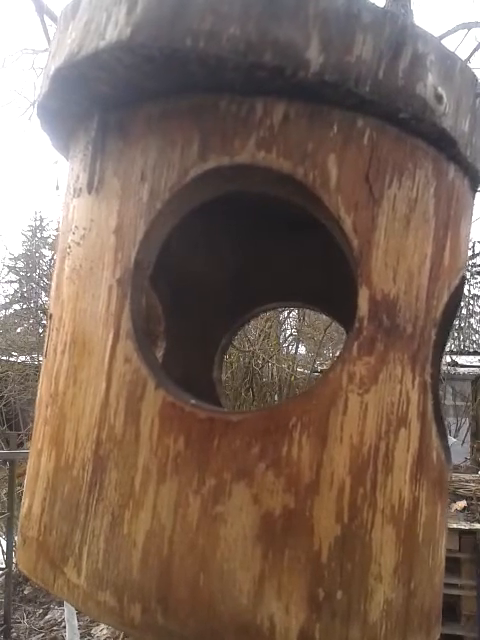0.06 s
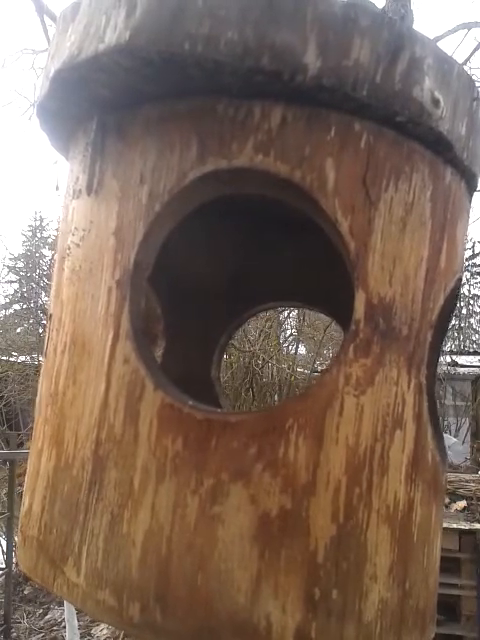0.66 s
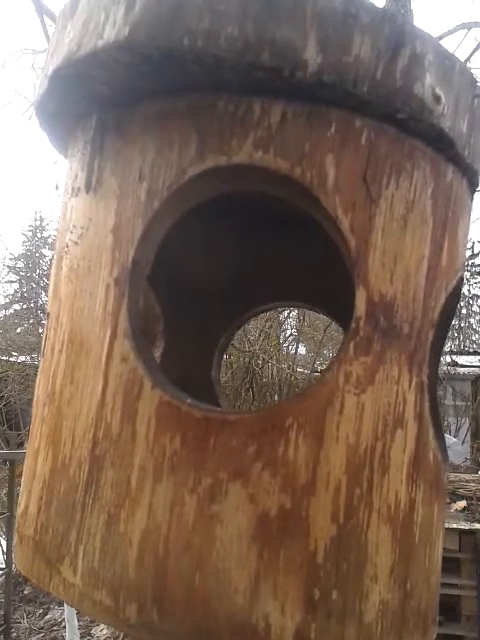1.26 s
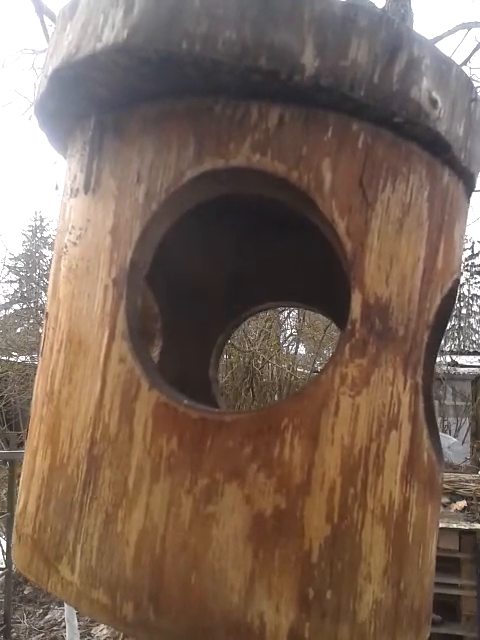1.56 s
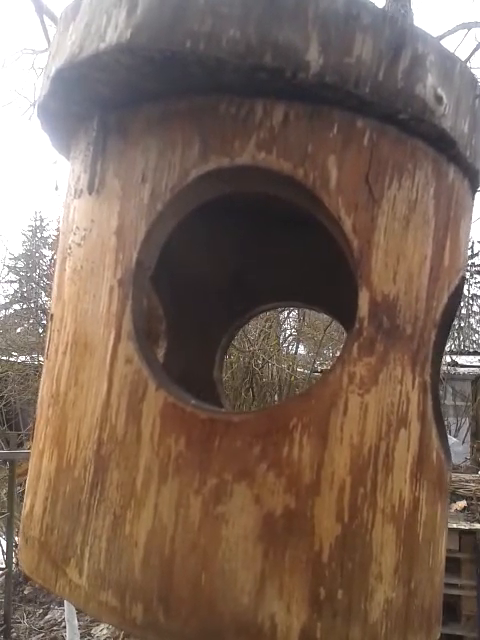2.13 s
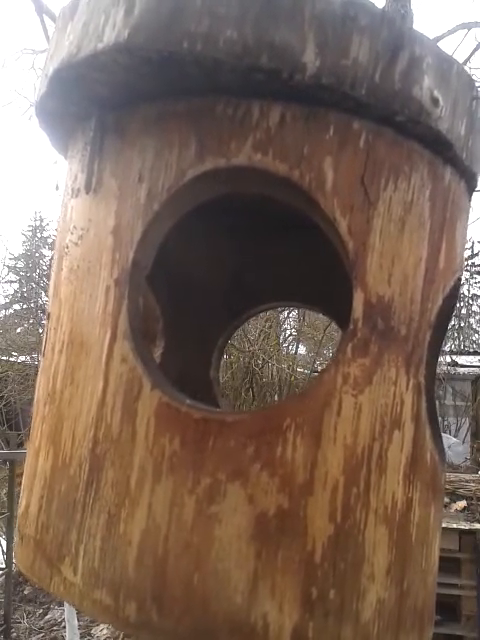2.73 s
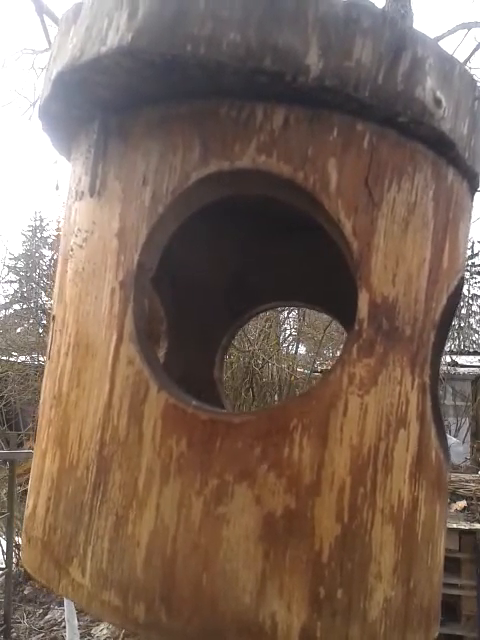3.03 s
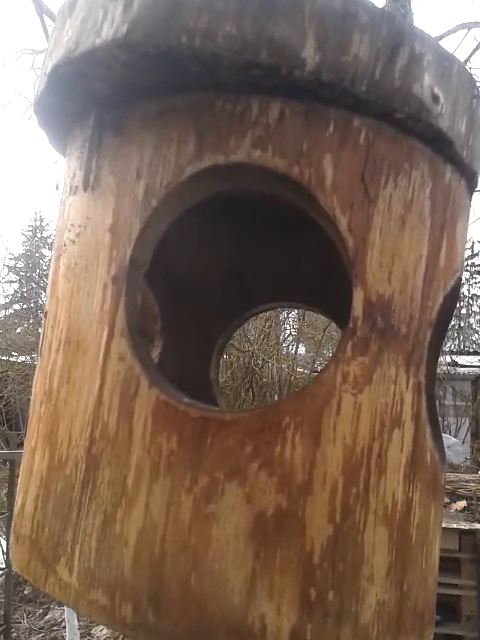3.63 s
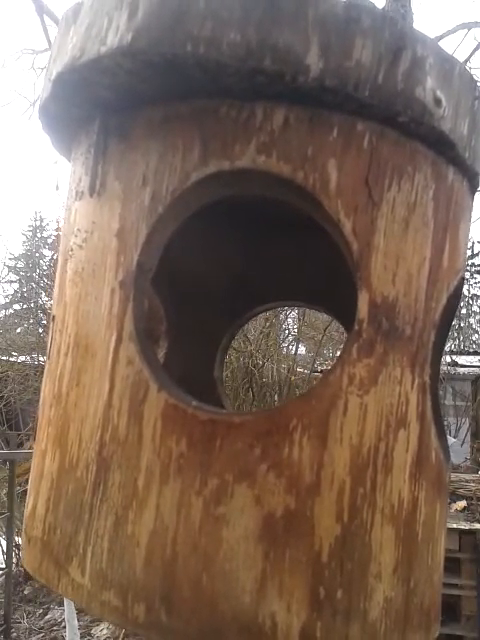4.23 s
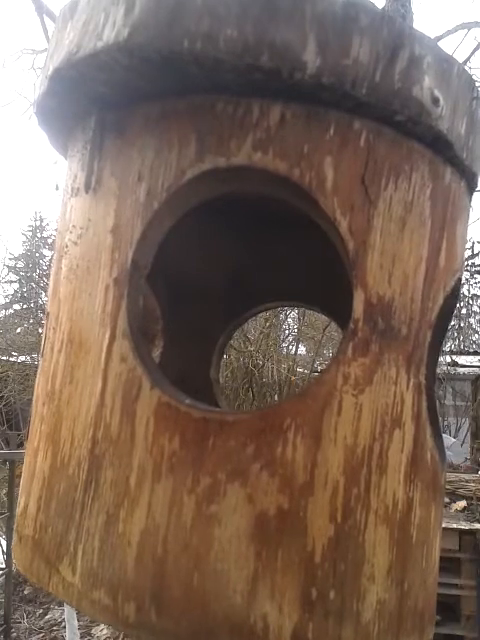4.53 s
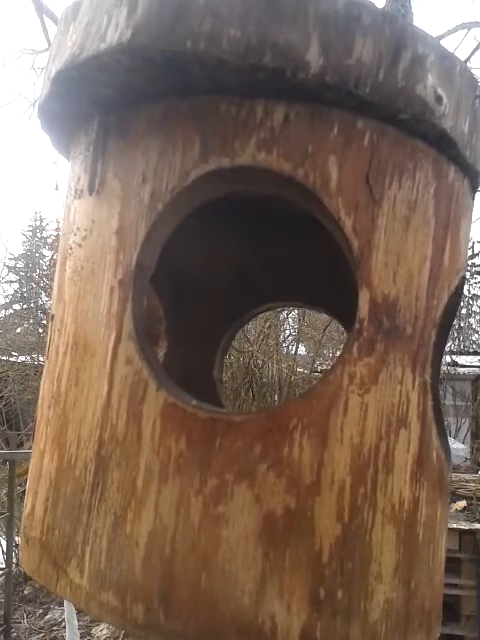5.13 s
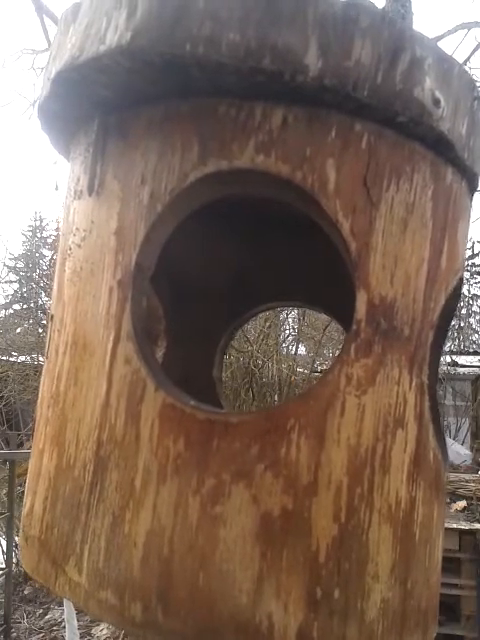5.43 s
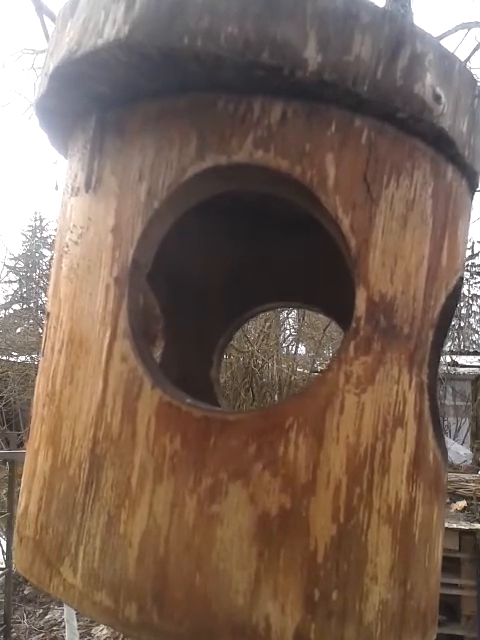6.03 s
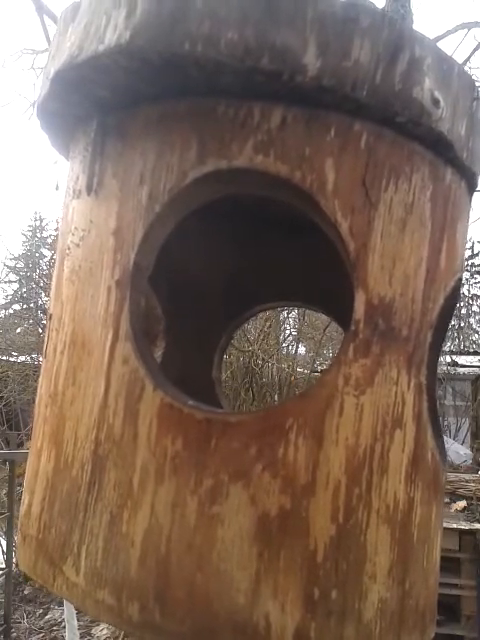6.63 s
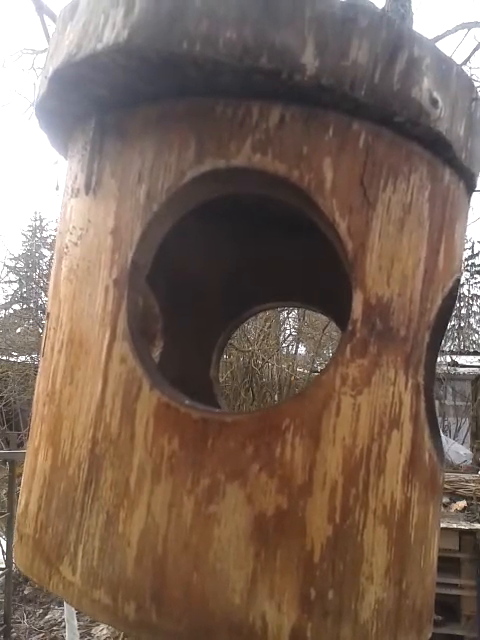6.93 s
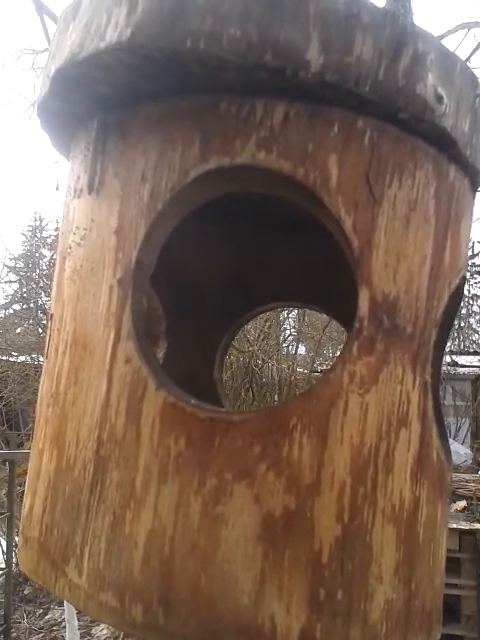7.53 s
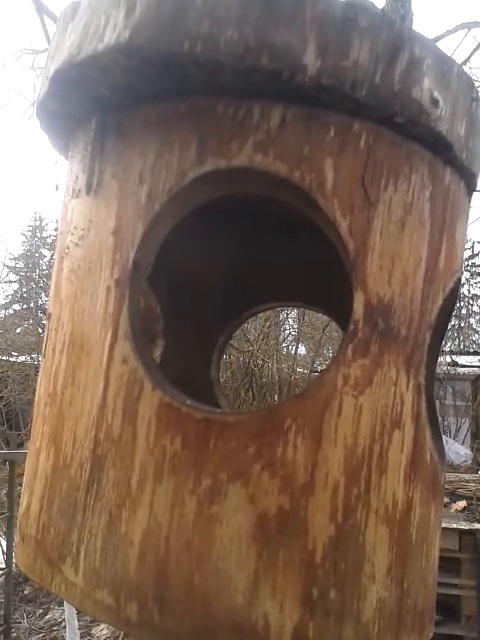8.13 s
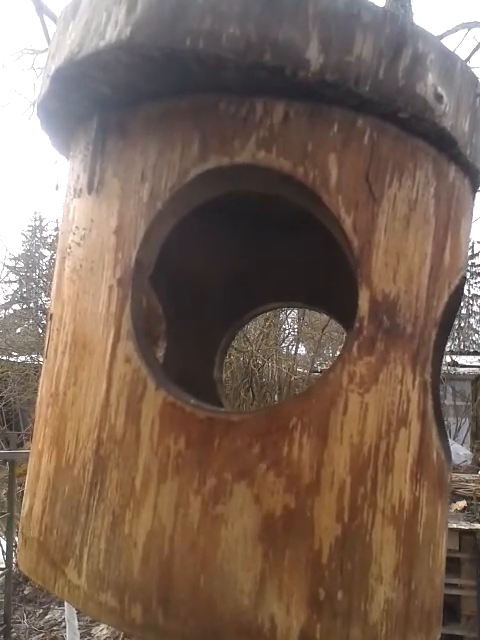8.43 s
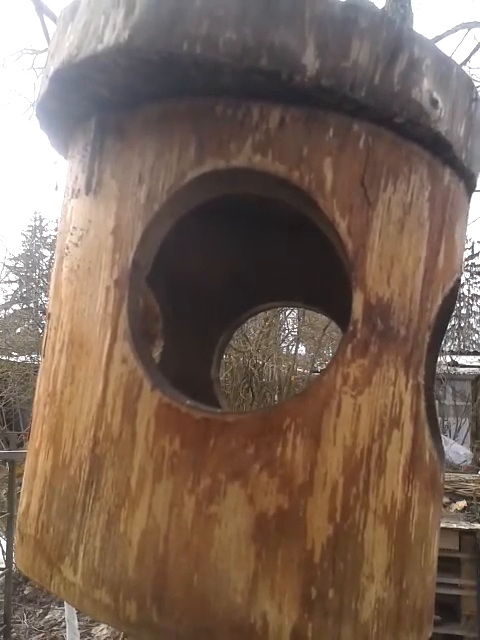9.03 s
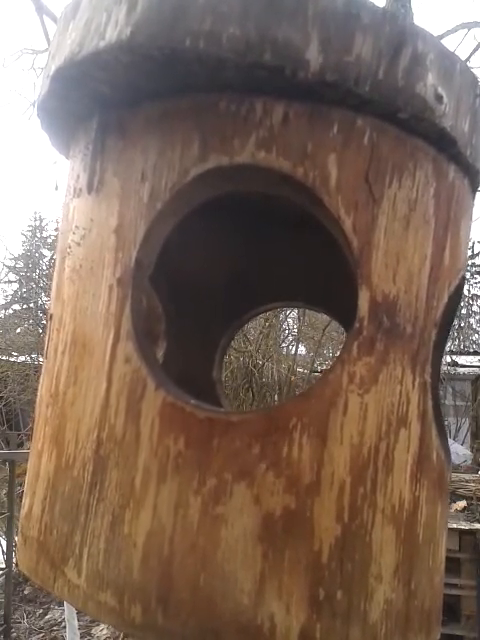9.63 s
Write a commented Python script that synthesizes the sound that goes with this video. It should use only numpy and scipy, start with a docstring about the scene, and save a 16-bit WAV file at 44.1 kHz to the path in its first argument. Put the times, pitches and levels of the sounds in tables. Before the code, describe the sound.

A quiet garden is heard for about ten seconds from beside a hollow log bird feeder. From the start, a distant hum and a steady, thin microphone hiss lie under small birds warbling in lightly echoing trees. A long thin whistle, lower than the chirps, wavers through the first two seconds. As it ends, from about 1.7 to 2.2 seconds, a few soft, scuffing bumps ring a hollow body close to the microphone. High, bright song bursts stand out at 0.6 seconds, are loudest between 2 and 3 seconds, and return from 7 to 9.5 seconds. A call that leaps up and slides down comes near 1, 3.6 and 4.4 seconds. Quick two-note calls, pips and rising and falling slurs are scattered throughout. The birds twitter on to the end, while the far hum swells a little over the second half.

```python
"""A quiet garden, one microphone beside a hollow log bird feeder.
From the start, a distant hum and the microphone's narrow hiss lie under small birds warbling in
echoing trees. A long thin whistle wavers through the first two seconds, while two-note calls, song
bursts, slurs, pips and a leaping call join in. As it ends, a few soft bumps ring a hollow body near
the microphone. The birds twitter on to the end, and the far hum swells a little."""
import sys
import numpy as np
from scipy import signal
from scipy.fft import rfft, irfft
from scipy.io import wavfile
from scipy.ndimage import uniform_filter1d

SR = 44100
rng = np.random.default_rng(int(sys.argv[2]) if len(sys.argv) > 2 else 0)


def to_wav(s):
    """Save 16-bit WAV."""
    ch = np.atleast_2d(s).T  # columns
    pcm = np.round(np.clip(ch, -1, 1) * 32767)  # PCM
    wavfile.write(sys.argv[1], SR, pcm.astype(np.int16))


N = 435266


def gain_of(db):
    """Decibels to amplitude."""
    return 10 ** (np.asarray(db) / 20)


def unit_rms(x):
    """Scales to rms 1."""
    return x / np.sqrt(np.mean(x ** 2) + 1e-20)


def spectrum_at(points, hz):
    """Reads a spectrum on a log-frequency axis."""
    f, db = np.transpose(points)
    return np.interp(np.log(hz + 1), np.log(f + 1), db)


def add(mix, start_s, sound):
    """Mixes a sound in at its start time."""
    part = mix[max(0, round(start_s * SR)):][:len(sound)]
    part += sound[:len(part)]


def wander(rate_hz):
    """Smooth random motion of rms 1, up to about the given rate."""
    hz = np.fft.rfftfreq(N, 1 / SR)
    return unit_rms(irfft(rfft(rng.standard_normal(N)) * np.exp(-(hz / rate_hz) ** 2), N))


def trees(x, direct_db=-3.3, early_db=-4.2, early_t60=.11, late_db=-7.3, late_t60=.7):
    """The way to the microphone: direct sound, quick scatter off trunks and walls, a thin long tail."""
    t = np.arange(SR) / SR
    early, late = rng.choice([-1., 1.], (2, SR)) * (rng.random((2, SR)) < 2000 / SR)  # sparse echoes
    early *= gain_of(-60 * t / early_t60)
    late *= gain_of(-60 * t / late_t60) * (1 - np.exp(-t / 0.022))
    response = gain_of(early_db) * early / np.linalg.norm(early)
    response += gain_of(late_db) * late / np.linalg.norm(late)
    response[0] += gain_of(direct_db)
    return signal.fftconvolve(x, response)[:N]


# Background hum and hiss: frequency_hz, relative_db
NOISE_SPECTRUM = [(25, -28), (60, -20.5), (120, -14), (220, -5.5), (380, 1), (700, -6.5), (1000, 0.5),
                  (1200, -5.5), (1750, -3.5), (2100, -9.5), (3300, -14), (4300, -7.5), (6300, -16.5),
                  (11000, -18), (15500, -16.5)]
# Resonances in the hum and hiss; the 5 kHz peak is the microphone's own: centre_hz, width_hz, lift_db
NOISE_RESONANCES = [(568.6, 180, 9.5), (809, 165, 7), (1360, 150, 3.5), (5028, 624, 16.5), (8516, 13, 9)]
# Swell of the distant hum: time_s, gain_db
HUM_SWELL = [(0, -2.5), (4.5, -2.26), (6.5, -1.14), (9.2, 0.5), (9.87, 0.7)]

def hum_and_hiss(level_db=-53.0, patchy_db=1.24):
    """Far surroundings hum and slowly swell, under steady hiss that peaks at the microphone's resonance."""
    frames, hz = N // 1024 + 5, np.fft.rfftfreq(4096, 1 / SR)
    real, imag, patches = rng.standard_normal((3, frames, len(hz)))
    patches = unit_rms(uniform_filter1d(uniform_filter1d(patches, size=5, axis=0), size=30, axis=1))
    colour_db = spectrum_at(NOISE_SPECTRUM, hz)
    colour_db += sum(db / (1 + 2 * ((hz - f) / width) ** 2) ** 2 for f, width, db in NOISE_RESONANCES)
    swell_db = np.interp(np.arange(frames) * 1024 / SR, *np.transpose(HUM_SWELL))
    hum_db = swell_db[:, None] / (1 + (hz / 2200) ** 4)
    spectra = (real + 1j * imag) * gain_of(colour_db + hum_db + patchy_db * patches)
    noise = signal.istft(spectra.T, nperseg=4096, noverlap=3072)[1][:N]
    return gain_of(level_db) * unit_rms(noise)


# Treble emphasis the microphone and its housing give the birdsong: frequency_hz, gain_db
MIC_COLOUR = [(2000, -17), (3300, -6.5), (4100, 1.5), (4600, -1), (5200, 5), (5700, 5), (6500, -13),
              (9000, -30)]
# A warble's two voices: pitch_ratio, gain_db, strokes_per_s, swing_hz
WARBLE_VOICES = [(0.97, 0, 34, 491), (.73, -9, 20, 580)]

def warble(notes, rasp_hz=70, flutter_db=1.5, upstroke_db=2, fade_db=4):
    """Two voices in the trees whip unevenly up and down, strongest on the upstroke."""
    out, t = np.zeros(N), np.arange(N) / SR
    for ratio, voice_db, strokes_per_s, swing_hz in WARBLE_VOICES:
        stroke = 2 * np.pi * strokes_per_s * t + 1.4 * wander(24)
        bend_hz = swing_hz * np.sin(stroke) + rasp_hz * wander(301)
        effort_db = flutter_db * wander(84) + upstroke_db * np.cos(stroke)
        for start, length, first_hz, last_hz, db in notes:
            span = np.clip(round(start * SR) + np.arange(round(length * SR)), 0, N - 1)
            progress = np.linspace(0, 1, len(span))
            hz = np.abs(ratio * (first_hz + (last_hz - first_hz) * progress) + bend_hz[span])
            envelope = gain_of(effort_db[span] - fade_db * progress + spectrum_at(MIC_COLOUR, hz))
            envelope *= signal.windows.tukey(len(span), .25)
            tone = np.sin(2 * np.pi * np.cumsum(hz) / SR)
            add(out, start, gain_of(db + voice_db) * unit_rms(envelope * tone))
    return trees(out, direct_db=-3.4, early_db=-5, early_t60=.16, late_db=-8, late_t60=.6)


# Chirps far off in the trees: start_s, length_s, first_hz, level_db
FAR_CHIRPS = [(0, 0.019, 4360, -47), (0.143, 0.066, 4485, -51.5), (1.331, .24, 4400, -46.5),
              (1.582, 0.21, 4500, -51.5), (2.038, 0.18, 4600, -51), (3.51, .13, 4360, -55),
              (4.19, 0.21, 2013, -62.5), (4.489, 0.19, 4870, -54.5), (4.619, 0.36, 4524, -51.5),
              (5.297, .15, 5310, -51), (5.408, .15, 4700, -51), (6.497, 0.17, 4615, -48.5),
              (6.778, 0.11, 4690, -54), (8.57, 0.15, 5010, -53), (8.801, .1, 5200, -57)]

def chirps(sag=.055):
    """Plain warbles, each losing a small share of its pitch."""
    return warble([(start, length, hz, hz * (1 - sag), db) for start, length, hz, db in FAR_CHIRPS])


# Course of the long whistle: time_s, pitch_hz, level_db
WHISTLE_COURSE = [(0.09, 1515, -54), (0.154, 1577, -56.5), (0.272, 1384, -60), (0.286, 1500, -58),
                  (0.57, 1525, -58.5), (0.794, 1492, -49.5), (1.178, 1616, -59), (1.528, 1435, -47.5),
                  (1.858, 1400, -50.5), (1.91, 1345, -55)]
# Its fuzz comes early, then clears: time_s, roughness_share
WHISTLE_ROUGHNESS = [(.12, 0.1), (.3, 1.04), (.62, 0.94), (.72, 0.15)]

def whistle(attack_s=0.013, release_s=0.082, fuzz_hz=55, boost_db=3.0, undertone_db=-66):
    """One thin tone with a faint octave below, reaching the microphone with little echo."""
    times, *columns = np.transpose(WHISTLE_COURSE)
    t = np.arange(N) / SR
    hz, db = (np.interp(t, times, column) for column in columns)
    rough = np.clip(np.interp(t, *np.transpose(WHISTLE_ROUGHNESS)), 0, 1)
    fuzz = np.sqrt(2 * (1 - rough)) + np.sqrt(rough) * (wander(fuzz_hz) + 1j * wander(fuzz_hz))
    attack = np.clip((t - times[0]) / attack_s, 0, 1)
    release = np.clip(1 - (t - times[-1]) / release_s, 0, 1) ** 2
    phase = 2 * np.pi * np.cumsum(hz) / SR
    partials = gain_of(db + boost_db) * np.exp(1j * phase) + gain_of(undertone_db) * np.exp(.5j * phase)
    tone = attack * release * (fuzz * partials).real
    return trees(tone, direct_db=-2, early_db=-27.0, early_t60=0.13, late_db=-18, late_t60=1.0)


def syrinx(hz, envelope, quaver, overtone_db=-19):
    """A bird's throat sings a quavering near sine; low notes carry a faint octave."""
    shake = unit_rms(uniform_filter1d(rng.standard_normal(len(hz)), size=70))
    phase = 2 * np.pi * np.cumsum(hz * (1 + quaver * shake)) / SR
    overtone = gain_of(overtone_db + spectrum_at(MIC_COLOUR, 2 * hz)) * np.sin(2 * phase)
    return unit_rms(envelope * (np.sin(phase) + overtone))


def fall(length_s, first_hz, rest_hz=1998, relax_s=.05):
    """A note that drops fast as the throat relaxes towards its resting pitch."""
    t = np.arange(0, length_s, 1 / SR)
    hz = rest_hz + (first_hz - rest_hz) * np.exp(-t / relax_s)
    return syrinx(hz, signal.windows.tukey(len(t), .5), quaver=0.03)


def arch(length_s, top_hz, drop, roundness=1.41, variety=0.44):
    """A note that climbs to its top and comes down, never with quite the same bend."""
    position = np.linspace(-1, 1, round(length_s * SR))
    depth = drop * (1 + variety * (rng.random() - .5))
    return syrinx(top_hz * (1 - depth * np.abs(position) ** roundness), 1 - position ** 2, quaver=0.042)


# A call repeated in the trees: start_s, first_hz, level_db
TWO_NOTE_CALLS = [(.17, 4400, -52), (.738, 4250, -54), (3.996, 4260, -54.5), (5.972, 4200, -55.5),
                  (8.032, 4100, -54), (8.8, 4100, -55.5)]

def two_note_calls(fall_s=.03, answer_db=-1.5):
    """A quick fall answered by a softer arch."""
    out = np.zeros(N)
    for start, hz, db in TWO_NOTE_CALLS:
        add(out, start, gain_of(db) * fall(fall_s, hz))
        add(out, start + fall_s, gain_of(db + answer_db) * arch(length_s=0.0504, top_hz=2920, drop=.17))
    return out


def glide(length_s, first_hz, octaves_per_s=-0.59, quaver=0.019):
    """A note that slides at a steady rate; by default it barely sags."""
    t = np.arange(0, length_s, 1 / SR)
    return syrinx(first_hz * 2 ** (octaves_per_s * t), signal.windows.tukey(len(t), .5), quaver)


# Thin notes in the trees: start_s, length_s, pitch_hz, level_db
HELD_NOTES = [(0.434, 0.023, 6900, -62.5), (1.828, 0.031, 6850, -70), (2.109, 0.073, 4430, -48),
              (2.448, 0.022, 6330, -66), (5.411, 0.066, 2757, -51.5), (6.445, 0.059, 2744, -54.5),
              (7.366, 0.071, 4100, -55.5)]

def held_notes():
    """A bird briefly holds a nearly level pitch."""
    out = np.zeros(N)
    for start, length, hz, db in HELD_NOTES:
        add(out, start, gain_of(db) * glide(length, hz))
    return out


# The loudest song at the microphone: start_s, length_s, accent_hz, last_hz, accent_db, warble_db, lead_db
SONG_BURSTS = [(0.58, 0.2, 5240, 4360, -42, -48, -48.5), (1.9, 0.13, 5310, 5010, -40, -47, -53.5),
               (2.472, 0.097, 5290, 3960, -39.5, -44.5, -71), (2.987, 0.067, 5190, 4670, -48, -46.5, -81),
               (3.041, 0.17, 4820, 4184, -42.5, -49.5, -64), (6.984, .19, 5150, 4060, -52, -45.5, -61),
               (7.505, 0.094, 5380, 4955, -45, -44.5, -59), (7.58, .21, 5530, 4590, -53, -50.5, -51),
               (8.449, .13, 5120, 4410, -50, -45, -52), (8.946, 0.13, 5360, 5090, -53, -49.5, -57),
               (9.389, .19, 5005, 4214, -45, -48, -54.5)]

def song_bursts(accent_s=.029, lead_s=.105, lead_ratio=.9, warble_ratio=0.96):
    """A warbled lead-in, then a held accent that breaks into a sinking warble."""
    accents, notes = np.zeros(N), []
    for start, length, hz, last_hz, accent_db, warble_db, lead_db in SONG_BURSTS:
        notes.append((start - lead_s, lead_s, hz * lead_ratio, hz * lead_ratio, lead_db))
        add(accents, start, gain_of(accent_db) * glide(accent_s, hz, quaver=0.03))
        notes.append((start, length, hz * warble_ratio, last_hz, warble_db))
    return trees(accents) + warble(notes)


# Downward slurs in the trees: start_s, length_s, first_hz, level_db
FALLING_SLURS = [(0.516, .07, 3750, -51), (1.578, 0.038, 3080, -51.5), (1.738, .05, 4380, -54),
                 (2.155, .045, 2700, -65), (2.681, 0.041, 4300, -60), (5.455, 0.028, 3970, -51),
                 (5.487, 0.03, 3050, -47), (6.119, 0.03, 4000, -59), (6.542, 0.035, 2964, -45),
                 (6.63, 0.033, 3150, -48), (7.42, 0.091, 3480, -59), (8.133, 0.027, 3760, -55.5),
                 (9.648, 0.049, 4400, -54)]

def falling_slurs():
    """Single notes that drop and begin to level off."""
    out = np.zeros(N)
    for start, length, hz, db in FALLING_SLURS:
        add(out, start, gain_of(db) * fall(length, hz))
    return out


# Pips in the trees: start_s, top_hz, level_db
ARCHED_PIPS = [(0.611, 2630, -52), (.722, 2785, -54), (1.778, 2970, -51.5), (1.941, 2384, -57.5),
               (2.103, 2930, -56), (3.334, 2297, -52.5), (3.436, 2868, -50), (3.612, 3100, -50.5),
               (3.956, 2820, -57), (6.361, 2980, -48), (6.763, 2184, -56), (6.864, 2843, -48),
               (6.977, 2844, -47), (7.761, 2740, -48), (9.309, 2880, -50.5)]

def pips(length_s=.04, drop=.27, upper_ratio=1.46, upper_db=-6.5):
    """Short arches sung in two voices at once."""
    out = np.zeros(N)
    for start, hz, db in ARCHED_PIPS:
        lower = arch(length_s, hz, drop)
        upper = gain_of(upper_db) * arch(length_s, hz * upper_ratio, drop)
        add(out, start, gain_of(db) * (lower + upper))
    return out


# Course of one leaping call: time_s, pitch_ratio, effort_db
LEAP_COURSE = [(0, .6, -15), (.061, .64, 2.5), (.073, .8, -8), (.087, 1, 2), (.1, .93, -1.5),
               (.119, .77, -10.5), (.14, .69, -1.5), (0.169, .62, -7.5), (.183, 0.48, -26)]
# That call from the trees: start_s, top_hz, level_db
LEAPING_CALLS = [(.974, 4164, -48), (3.645, 4230, -48), (4.361, 4080, -52)]

def leaping_calls():
    """A call that holds, leaps up and slides down."""
    out = np.zeros(N)
    times, *columns = np.transpose(LEAP_COURSE)
    t = np.arange(0, times[-1], 1 / SR)
    ratio, effort_db = (uniform_filter1d(np.interp(t, times, column), size=250) for column in columns)
    envelope = gain_of(effort_db) * signal.windows.tukey(len(t), .1)
    for start, hz, db in LEAPING_CALLS:
        add(out, start, gain_of(db) * syrinx(hz * ratio, envelope, quaver=0.0285))
    return out


# Upward slurs in the trees: start_s, length_s, first_hz, level_db
RISING_SLURS = [(1.336, 0.012, 6600, -58.5), (1.536, 0.037, 2540, -52), (3.075, .018, 6000, -62),
                (3.101, 0.021, 2510, -53), (3.166, 0.044, 2880, -53), (3.318, 0.045, 3220, -52.5),
                (4.715, .014, 5840, -61), (4.935, .024, 3650, -47.5), (6.488, 0.025, 3140, -50.5),
                (6.758, 0.039, 3250, -50.5), (7.065, .014, 6000, -54), (7.141, 0.048, 2790, -53),
                (7.752, .02, 3380, -52), (7.865, 0.021, 1600, -54)]

def rising_slurs():
    """Quick upward flicks of pitch."""
    out = np.zeros(N)
    for start, length, hz, db in RISING_SLURS:
        add(out, start, gain_of(db) * glide(length, hz, octaves_per_s=13))
    return out


# Modes of the hollow body: pitch_hz, relative_db, t60_s
HOLLOW_MODES = [(99, -21, 0.716), (164, -37, .1), (230, 6, 0.15), (285, 6, 0.058), (577, 7.5, 0.051),
                (830, -17, 0.028)]
# Bumps close to the microphone: start_s, level_db, scuff_s
CLOSE_BUMPS = [(1.674, -57, 0.045), (1.747, -59, .05), (1.821, -60, 0.12), (2.037, -54.5, 0.17),
               (2.127, -47.5, 0.025), (2.179, -51.5, 0.011)]

def bumps(scuff=0.046, boost_db=2, low_cut_hz=135):
    """A soft push with a short scuff rings a hollow body, too small to radiate deep bass."""
    out, t = np.zeros(N), np.arange(SR // 2) / SR
    body = sum(gain_of(db - 60 * t / t60) * np.sin(2 * np.pi * hz * t) for hz, db, t60 in HOLLOW_MODES)
    body = signal.sosfilt(signal.butter(2, low_cut_hz, "high", fs=SR, output="sos"), body)
    for start, db, scuff_s in CLOSE_BUMPS:
        force = scuff * rng.standard_normal(len(t)) * np.exp(-(t / scuff_s) ** 2)
        force[0] += 1  # the push
        ring = signal.fftconvolve(force, body)
        onset_rms = ring[:SR // 25].std()
        add(out, start, gain_of(db + boost_db) * ring / (2 * onset_rms))
    return out


def scene():
    """The garden from the feeder, in mono: hum far off, birds in the trees, bumps close by."""
    mix = hum_and_hiss() + chirps() + whistle() + song_bursts()
    notes = two_note_calls() + held_notes() + falling_slurs() + pips() + leaping_calls() + rising_slurs()
    return (mix + trees(notes) + bumps())[None]


def record(dry):
    """The recorder's band limit."""
    low_pass = signal.firwin(511, cutoff=15800, window=("kaiser", 9), fs=SR)
    return signal.oaconvolve(dry, low_pass[None], "same")


dry = scene()
out = record(dry)
to_wav(out)
```